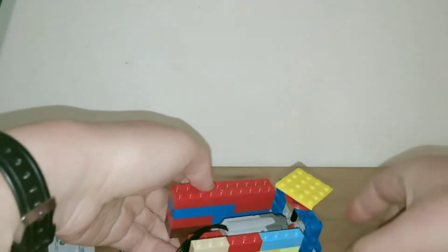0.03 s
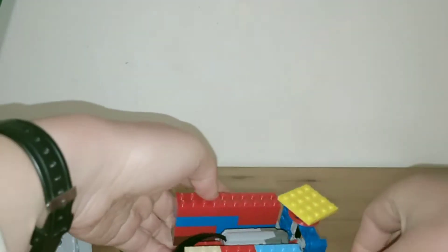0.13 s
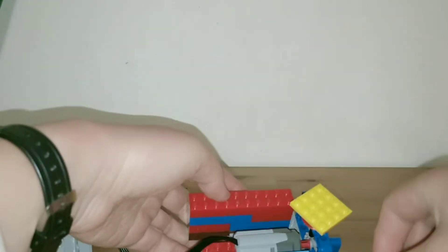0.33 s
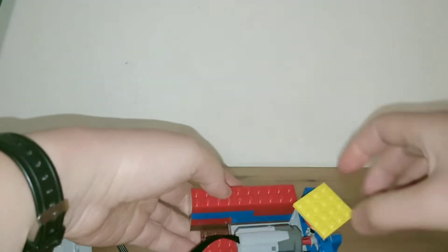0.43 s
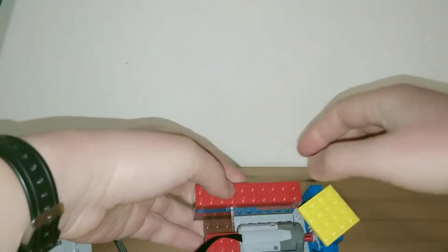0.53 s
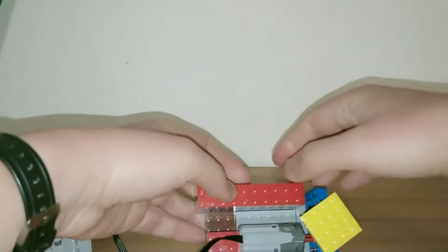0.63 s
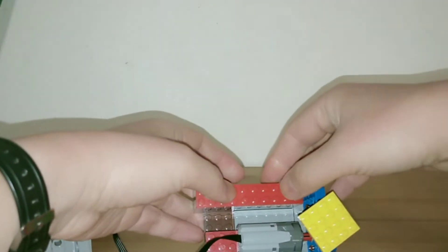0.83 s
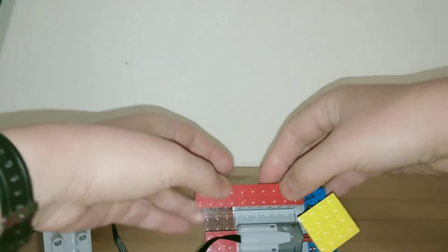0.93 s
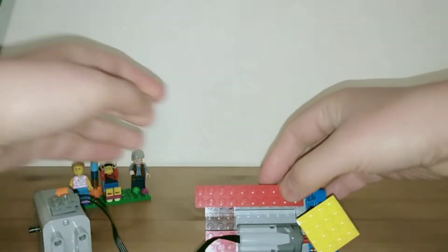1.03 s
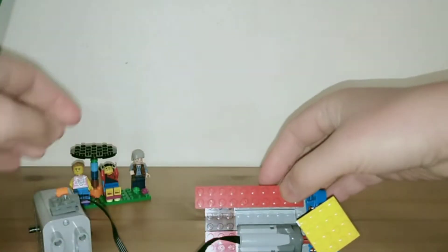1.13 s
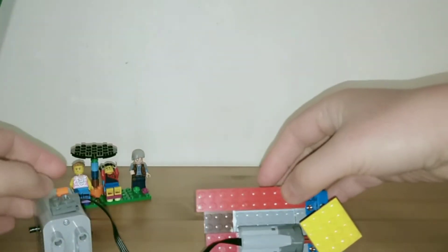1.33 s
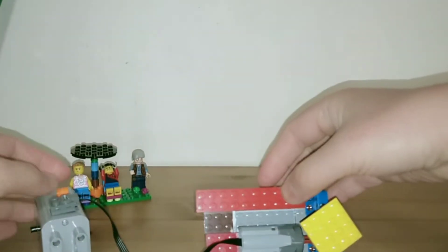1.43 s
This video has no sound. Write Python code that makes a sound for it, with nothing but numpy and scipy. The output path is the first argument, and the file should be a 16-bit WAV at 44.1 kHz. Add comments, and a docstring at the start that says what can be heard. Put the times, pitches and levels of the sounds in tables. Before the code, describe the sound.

Close up in a quiet room, a model of plastic toy bricks clatters down twice, making a wooden desk thump. It then scrapes along briefly, clicks as fingers press it, and gets one soft pat.

```python
"""Fingers rub dully on the hollow shell of a plastic toy-brick model, in a quiet room.
A loose plate scuffs, then the model lands in two clattering knocks that make a wooden desk boom.
It is dragged, slid and pressed into place, and a fingertip pats it softly.
Every rub is a stream of tiny slips ringing the plastic, every click a short crack of noise
through the model's resonances; the desk and the pat ring as dying sine tones."""
import sys
import numpy as np
from scipy import signal
from scipy.fft import rfft, irfft, next_fast_len
from scipy.io import wavfile

SR = 44100
rng = np.random.default_rng(int(sys.argv[2]) if len(sys.argv) > 2 else 0)


def to_wav(s):
    """Save 16-bit WAV."""
    ch = np.atleast_2d(s).T  # columns
    pcm = np.round(np.clip(ch, -1, 1) * 32767)  # PCM
    wavfile.write(sys.argv[1], SR, pcm.astype(np.int16))


N = 66150
T = np.arange(N) / SR

# Fader rides for the fingers and the desk rumble. Each row: time in seconds, level in dB.
FINGER_RIDE = [(0, -55), (0.045, -60), (0.15, -75), (0.2, -51), (0.24, -63), (0.34, -55), (0.385, -49.5),
               (0.44, -57), (0.49, -64), (0.56, -56.5), (0.7, -56), (0.733, -60), (0.757, -44),
               (0.86, -50.5), (0.92, -54.5), (0.97, -68), (1.05, -70.5), (1.085, -76.5), (1.175, -87.5),
               (1.5, -87)]
RUMBLE_RIDE = [(0, -63), (0.17, -62), (0.23, -57.5), (0.45, -58.5), (0.6, -57), (0.86, -55.5), (1.0, -62),
               (1.33, -63.5), (1.5, -72)]

# Tone colour of each sound. Each row: frequency in Hz, relative level in dB.
AIR_EQ = [(30, -9.5), (300, -8.5), (800, 7), (1400, -5), (2500, -13), (5000, -15), (15000, -23)]
RUMBLE_EQ = [(20, -23), (45, -20), (65, -9), (85, -2), (105, -8.5), (128, 5), (155, -7), (190, -10.5),
             (260, -34), (420, -37.5), (1000, -60)]
FINGER_EQ = [(70, -24.5), (170, 3), (260, 0.5), (370, -1.5), (480, -12.5), (700, -26), (1000, -40.5),
             (2000, -62.5), (6000, -72.5)]
GROAN_EQ = [(150, -24.5), (300, 0.5), (400, -4), (520, -15.5), (700, -12.5), (1000, -30.5), (3000, -49)]
BRUSH_EQ = [(800, -13), (1600, -11), (3000, -5), (5500, -10.5), (7500, -8)]
SCUFF_EQ = [(300, -21.5), (600, -18.5), (1000, -8), (1400, -0.5), (1600, -10), (1950, 0), (2300, -6),
            (2800, -0.5), (3900, -7), (4500, -3), (6200, -4.5), (6800, -16.5), (7600, -23)]
CLACK_EQ = [(200, -6), (450, -5.5), (800, 4.5), (1400, -0.5), (2200, 3), (3300, 0.5), (4100, -8.5),
            (5000, -23.5), (8000, -46)]
TICK_EQ = [(1500, -33), (3500, -14.5), (4300, -9), (4800, 7.5), (5250, 7.5), (5750, -1), (6250, 3),
           (6900, -4.5), (7600, -18.5), (8200, -29)]
DRAG_EQ = [(200, -4), (450, 2), (700, -3), (1200, -2), (2300, -5), (3200, -13), (4100, -22.5),
           (5100, -13.5), (6100, -17), (7100, -15), (7700, -35.5)]
SLIDE_EQ = [(350, -35.5), (520, -1), (680, 10), (880, -3.5), (1130, -2), (1450, -17), (1750, -7.5),
            (2100, -44.5), (3000, -23.5), (4100, -40.5), (4600, -20.5), (5200, -21), (6100, -9),
            (7200, -21), (7800, -68)]
PRESS_EQ = [(250, -1.5), (500, 8), (700, -2), (1000, 3), (1400, -12), (1700, -9.5), (2000, -21),
            (2450, -12), (3500, -20.5), (4200, -39), (4900, -16.5), (5400, -16), (6000, -29), (6900, -24),
            (7600, -43)]

# Resonances of the plastic. Each row: pitch in Hz, width in Hz, lift in dB before any ring_db trim.
SHELL_MODES = [(246, 24, 7), (334, 28, 8), (402, 16, 5), (505, 28, 7)]
GROAN_MODES = [(360.3, 8.7, 6.7), (400.8, 5, 19)]
STUD_MODES = [(1628, 84, 26), (5340, 120, 22), (6200, 93, 20), (6300, 95, 9.8)]
PLATE_MODES = [(858, 30, 9), (1325, 30, 18), (1407, 24, 21), (1834, 26, 21), (1962, 44, 21), (2900, 150, 7),
               (5100, 110, 8), (5800, 110, 14), (6362, 40, 14)]
MODEL_MODES = [(622, 26, 12), (968, 36, 12), (1116, 36, 8), (1660, 34, 11), (1887, 36, 9), (2297, 60, 12),
               (2728, 40, 6), (3017, 36, 8), (3220, 50, 7), (3570, 60, 3), (4921, 70, 12), (5175, 55, 12),
               (5490, 60, 7), (6740, 80, 5)]

# Rubbing gestures. Each row: start, attack and hold in seconds, release in dB per second, level in dB.
GROAN_STROKES = [(-0.079, 0.0083, 0.01, 91, -52.5)]
BRUSH_STROKES = [(-0.01, 0.01, 0.0083, 280, -73), (0.070, 0.017, .005, 200, -96),
                 (1.062, 0.0084, 0.0058, 353.6, -89)]
SCUFF_STROKES = [(0.166, 0.005, 0.018, 299.5, -69.5), (0.180, 0.016, .005, 516.5, -48.5)]
DRAG_STROKES = [(0.272, .016, .05, 149.5, -57), (0.365, 0.022, 0.046, 135, -60)]
SLIDE_STROKES = [(0.505, 0.035, 0.04, 137, -52.5), (0.618, 0.019, 0.022, 296, -53)]
PRESS_STROKES = [(0.732, 0.032, 0.0093, 278, -48.5), (0.80, 0.032, 0.011, 403, -76.5)]

# The model lands on the desk. Each row: start in seconds, then boom, thump and woody ring levels in dB.
LANDINGS = [(0.2601, -34.5, -32.5, -40), (0.4058, -46.5, -31.5, -30.5)]
# Woody ring of the desk top. Each row: pitch in Hz, relative level in dB, 60 dB decay time in seconds.
DESK_MODES = [(251.8, -4, 0.13), (336.6, -9, .12), (432.4, -12, 0.12), (499, -6, 0.076)]
# Bricks hit each other and the desk. Each row: start in seconds, clack level in dB, tick level in dB.
BRICK_HITS = [(0.2618, -41, -44.5), (0.265, -43.5, -40.5), (0.2666, -34.5, -37.5), (0.2697, -40, -43),
              (0.2738, -45, -59.5), (0.2766, -49, -48), (0.2902, -50.5, -63.5), (0.3304, -61.5, -61),
              (0.3883, -62, -62), (0.4092, -43, -46.5), (0.4133, -42.5, -48), (0.4145, -37, -43.5),
              (0.4168, -44.5, -45.5), (0.4195, -35, -37.5), (0.4263, -38, -40), (0.4310, -51, -46.5),
              (0.4339, -47, -48), (0.77, -50, -60.5), (0.7747, -47.5, -53), (0.777, -49.5, -51),
              (0.7970, -57.5, -69)]


def from_db(db):
    """Decibels to gain."""
    return 10 ** (np.asarray(db) / 20)


def fader(ride):
    """Gain over time, gliding between the points of a ride."""
    return from_db(np.interp(T, *np.transpose(ride)))


def body(x, eq, modes=(), ring_db=0):
    """A resonant body at unit power gain: smooth EQ plus peaks, their lift trimmed by ring_db."""
    size = next_fast_len(2 * N, real=True)
    hz = np.maximum(np.fft.rfftfreq(size, 1 / SR), 1)
    eq_hz, eq_db = np.transpose(eq)
    colour = from_db(np.interp(np.log(hz), np.log(eq_hz), eq_db))
    peaks = 1 + sum(from_db(lift + ring_db) ** 2 / (1 + (2 * (hz - pitch) / width) ** 2)
                    for pitch, width, lift in modes)
    gain = unit_rms(colour * np.sqrt(peaks))
    # Minimum phase, so the ring follows the hit.
    cepstrum = irfft(np.log(gain), size)
    cepstrum[1:size // 2] *= 2
    cepstrum[size // 2 + 1:] = 0
    return irfft(rfft(x, size) * np.exp(rfft(cepstrum)), size)[:N]


def unit_rms(x):
    """Scale to an rms of one."""
    return x / np.sqrt(np.mean(x ** 2) + 1e-20)


def ring(start, hz, t60_s, attack_s=0.0027):
    """One struck mode: it builds while the contact lasts, then dies away."""
    age = np.maximum(T - start, 0)
    envelope = np.minimum(age / attack_s, 1) * np.exp(-np.log(1000) * age / t60_s)
    return envelope * np.sin(2 * np.pi * hz * age)


def friction(slips_per_s=2500, spread_db=1.5):
    """A dense grain of tiny slips, uneven in size."""
    sizes = from_db(spread_db * np.minimum(rng.exponential(1, N), 4))
    signs = rng.choice([-1, 1], N)
    slipping = rng.random(N) < slips_per_s / SR
    return unit_rms(sizes * signs * slipping)


def rub(strokes):
    """Friction swells, holds and fades under each stroke."""
    force = 0
    for start, attack, hold, release, db in strokes:
        swell = np.clip((T - start) / attack, 0, 1) ** 2
        force += swell * from_db(db - release * np.maximum(T - start - attack - hold, 0))
    return body_force_grain(force)


def room_air():
    """The faint noise bed of a still room."""
    return from_db(-90.5) * body(rng.standard_normal(N), AIR_EQ)


def desk_rumble():
    """Low noise from the desk swells and sinks under the action."""
    return fader(RUMBLE_RIDE) * body(rng.standard_normal(N), RUMBLE_EQ)


def finger_rub():
    """Fingers rub a dull, hollow tone out of the shell."""
    return body(fader(FINGER_RIDE) * friction(), FINGER_EQ, SHELL_MODES)


def skin_groan():
    """Skin drags on smooth plastic with a faint low groan."""
    return body(rub(GROAN_STROKES), GROAN_EQ, GROAN_MODES)


def stud_brush():
    """Studs brush past each other, light and bright."""
    return body(rub(BRUSH_STROKES), BRUSH_EQ, STUD_MODES)


def plate_scuff():
    """A quick scuff rings the loose plate."""
    return body(rub(SCUFF_STROKES), SCUFF_EQ, PLATE_MODES)


def desk_knocks():
    """Each landing strikes a long boom, a short thump and a woody ring from the desk."""
    knocks = np.zeros(N)
    for start, boom_db, thump_db, wood_db in LANDINGS:
        boom = from_db(boom_db) * ring(start, hz=138.15, t60_s=0.53)
        thump = from_db(thump_db) * ring(start, hz=102.74, t60_s=0.1)
        wood = sum((-1) ** k * from_db(wood_db + db) * ring(start, hz, t60_s)
                   for k, (hz, db, t60_s) in enumerate(DESK_MODES))
        knocks -= boom + thump + wood
    return knocks


def brick_clatter(crack_s=0.002):
    """Each hit cracks into the model's modes: a midrange clack with a treble tick on top."""
    clack_power, tick_power = 0, 0
    for start, clack_db, tick_db in BRICK_HITS:
        crack = (T >= start) * np.exp(-np.clip((T - start) / crack_s, 0, 20))
        clack_power += (crack * from_db(clack_db)) ** 2
        tick_power += (crack * from_db(tick_db)) ** 2
    grit = rng.standard_normal((2, N))
    clack = body(np.sqrt(clack_power) * grit[0], CLACK_EQ, MODEL_MODES, ring_db=-2)
    tick = body(np.sqrt(tick_power) * grit[1], TICK_EQ, MODEL_MODES, ring_db=-9)
    return clack + tick


def model_drag():
    """The model scrapes along, its ring damped by the grip."""
    return body(rub(DRAG_STROKES), DRAG_EQ, MODEL_MODES, ring_db=-5)


def model_slide():
    """The model slides and rings more freely."""
    return body(rub(SLIDE_STROKES), SLIDE_EQ, MODEL_MODES, ring_db=1)


def model_press():
    """A short, lightly damped rub as the model is pressed into place."""
    return body(rub(PRESS_STROKES), PRESS_EQ, MODEL_MODES, ring_db=-2.5)


def fingertip_pat():
    """A fingertip lands softly on the shell and sounds one low mode."""
    return from_db(-47) * ring(start=1.096, hz=268.5, t60_s=0.098, attack_s=0.019)


def room_reverb(x, t60_s=0.19, predelay_s=0.008, wet_db=-16.5):
    """The room answers with a short diffuse tail."""
    tail = rng.standard_normal(N) * (T > predelay_s) * np.exp(-np.log(1000) * T / t60_s)
    tail /= np.sqrt(np.sum(tail ** 2))
    return from_db(wet_db) * signal.fftconvolve(x, tail)[:N]


def scene():
    """A close mono mix; only the brick sounds feed the reverb."""
    bed = room_air() + desk_rumble()
    hands = finger_rub() + skin_groan() + fingertip_pat()
    bricks = stud_brush() + plate_scuff() + brick_clatter()
    bricks += model_drag() + model_slide() + model_press()
    return (bed + hands + desk_knocks() + bricks + room_reverb(bricks))[None]


def record(dry, cutoff_hz=7870, hiss_db=-99, hiss_top_hz=15800):
    """A steep treble cut, with a trace of hiss laid over it."""
    treble_cut = signal.ellip(10, .3, 70, cutoff_hz, fs=SR, output="sos")
    hiss_cut = signal.butter(10, hiss_top_hz, fs=SR, output="sos")
    hiss = from_db(hiss_db) * rng.standard_normal(dry.shape)
    return signal.sosfilt(treble_cut, dry) + signal.sosfilt(hiss_cut, hiss)


def body_force_grain(force):
    """Friction follows the force."""
    return force * friction()


dry = scene()
out = record(dry)
to_wav(out)
```